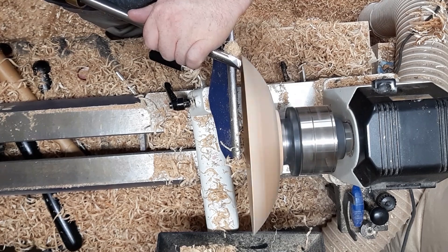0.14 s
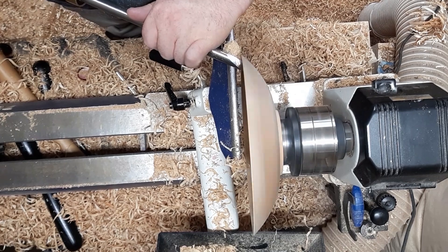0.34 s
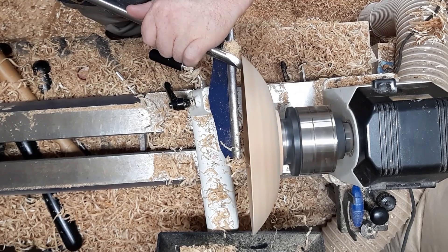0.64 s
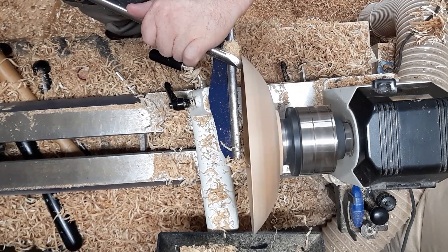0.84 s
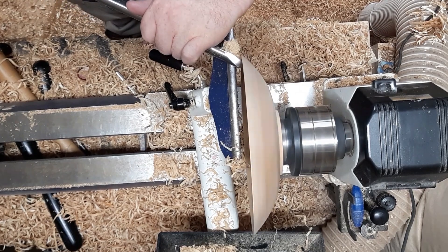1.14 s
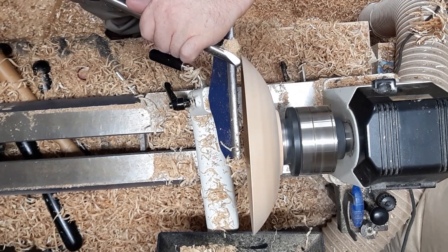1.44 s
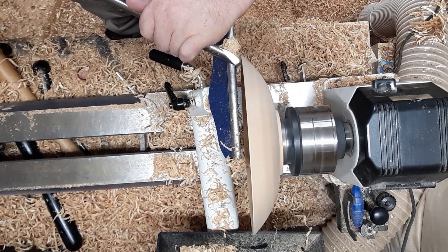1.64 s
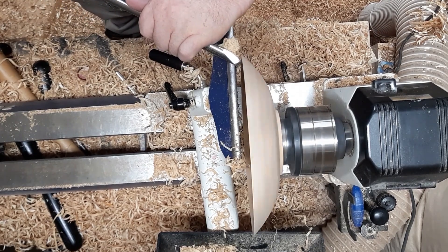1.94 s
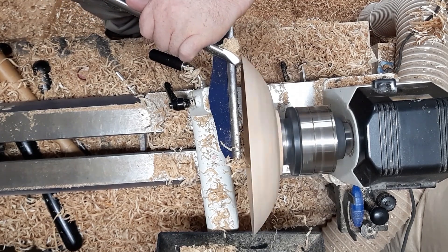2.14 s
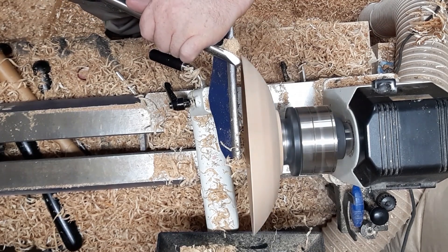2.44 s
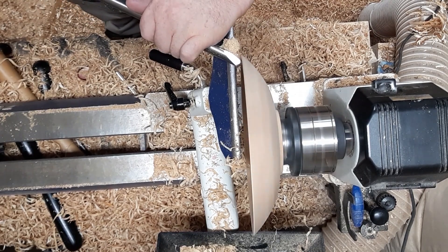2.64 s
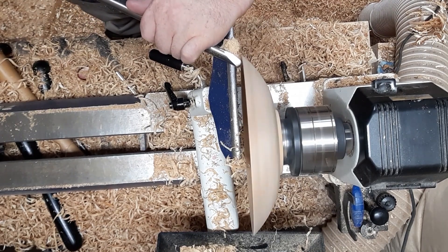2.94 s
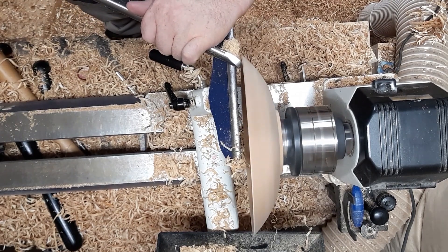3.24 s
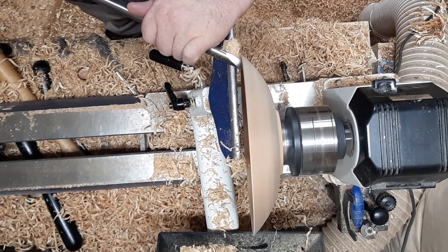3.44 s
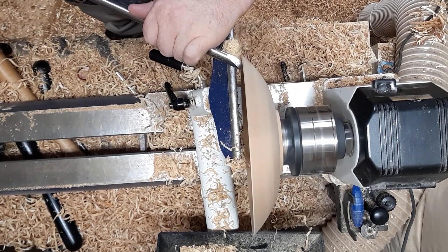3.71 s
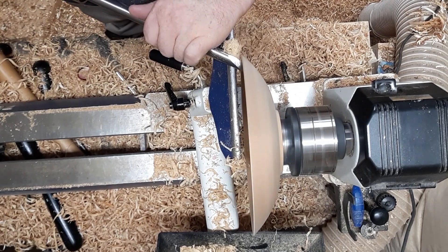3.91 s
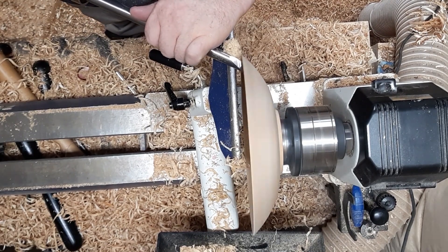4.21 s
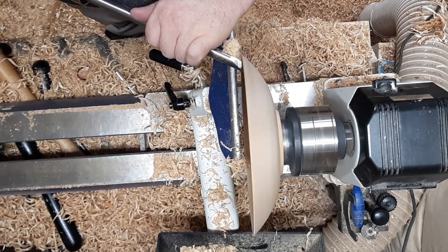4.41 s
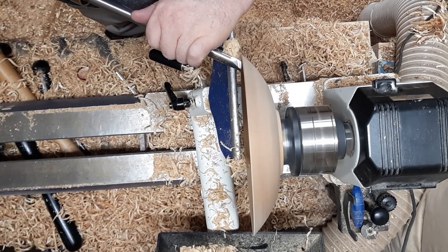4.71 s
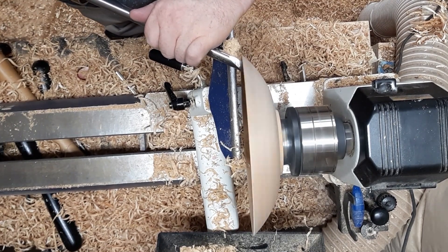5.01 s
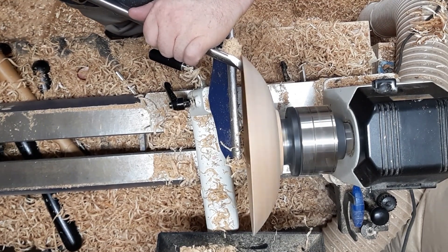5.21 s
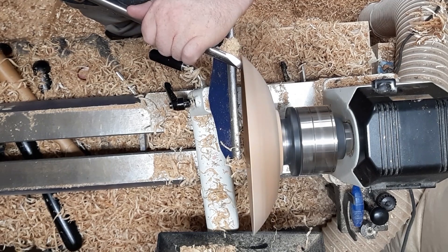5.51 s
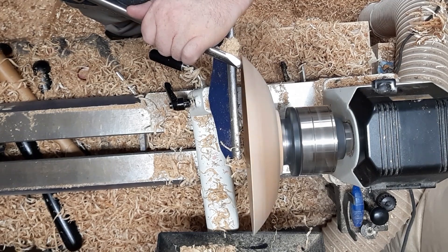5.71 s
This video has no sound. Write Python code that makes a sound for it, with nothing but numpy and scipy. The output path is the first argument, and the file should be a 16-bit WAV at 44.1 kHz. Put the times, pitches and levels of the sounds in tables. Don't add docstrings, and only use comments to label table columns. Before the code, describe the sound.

Rapid pulsing wood-lathe scrape with ringing chatter, a brief break of motor whir and belt knocks, then the shaving noise returns until the end.

```python
import sys
import numpy as np
from scipy import signal
from scipy.fft import rfft, irfft, next_fast_len
from scipy.io import wavfile
from scipy.ndimage import map_coordinates

SR = 44100
rng = np.random.default_rng(int(sys.argv[2]) if len(sys.argv) > 2 else 0)


def wrap_up_sound(samples):
    columns = np.atleast_2d(samples).T
    tamed = np.clip(columns, -1, 1)
    steps = np.round(tamed * 32767).astype(np.int16)
    wavfile.write(sys.argv[1], SR, steps)


def undo_db(level):
    steps = np.asarray(level, float) / 20
    return 10 ** steps


N = 258426
FIRM_DB = -30
PROUD_FLOOR_DB = -20


def unit(x):
    return x / np.sqrt(np.mean(x ** 2) + 1e-20)


def along(points, hz):
    f, v = np.transpose(points)
    return np.interp(np.log(hz + 1), np.log(f + 1), v)


def wobble(rate_hz):
    knots = rng.standard_normal(int(N * rate_hz / SR) + 4)
    return map_coordinates(knots, [np.arange(N) * rate_hz / SR])


def bumps(rows):
    t = np.arange(N) / SR
    return sum(db * np.exp(-.5 * ((t - s) / half_s) ** 2) for s, half_s, db in rows)


def filtered(x, response):
    m = next_fast_len(N + 8192)
    spectrum = rfft(x, m) * response(np.fft.rfftfreq(m, 1 / SR))
    return irfft(spectrum, m)[..., :N]


def mode(f, hz, width_hz):
    return 1j * f * width_hz / (hz * hz - f * f + 1j * f * width_hz)


def colour(spectrum, modes):
    def response(f):
        resonances = sum(undo_db(db) * mode(f, hz, width_hz) for hz, width_hz, db in modes)
        return undo_db(along(spectrum, f)) * (1 + resonances)
    return response


def steady(cycles):
    phase = 2 * np.pi * cycles
    return np.sqrt(2) * np.array([np.sin(phase), -np.cos(phase)])


def turns():
    # (time [s], turns done)
    spindle = [(-.008, 0), (.784, 12), (1.246, 19), (2.63, 40), (2.963, 45), (5.75, 87), (5.95, 90)]
    return np.interp(np.arange(N) / SR, *np.transpose(spindle))


def grips(spread_turns, *places):
    angle = turns()
    out = 0
    for at, size in zip(places[::2], places[1::2]):
        offset = (angle - at + .5) % 1 - .5
        out = out + size * np.exp(-.5 * (offset / spread_turns) ** 2)
    return out


def surface(memory):
    per_turn = 2925
    keep = np.clip(memory, 0, .97)
    ridges = signal.lfilter([1], [1, -keep], rng.standard_normal((2, 92, per_turn)), axis=1)
    return unit(ridges.reshape(2, -1)[:, (turns() * per_turn).astype(int)])


def fibres(grain_db):
    return unit(undo_db(grain_db * wobble(700)) * rng.standard_normal((2, N)))


def hand():
    # (time [s], pressure as shaving level [dB], hard spot proud [dB])
    passes = [
        [(0, -31.5, -39), (.16, -30, -20.5), (.43, -31, -6), (.6, -35, -4.5), (.8, -29, -2), (1.05, -35, -2.5),
         (1.35, -31.5, -3), (1.48, -50, 3.5), (1.62, -64.5, 7.5)],
        [(2.87, -31, -1), (3.07, -27.5, -4.5), (3.45, -29.5, -5), (3.7, -26, -7), (4.15, -28, -14.5),
         (4.4, -28.5, -42), (5.1, -30, -18), (5.32, -28.5, -8), (5.87, -29, -3.5)],
    ]
    # (time [s], half length [s], level [dB])
    eases = [
        (.33, 0.047, -8.5),
        (1.18, 0.048, -11),
        (4.6, 0.068, -5.5),
        (4.8, 0.072, -4),
        (5.58, 0.07, -3),
        (5.72, 0.049, -10.5),
    ]
    entry_s, rise_s, entry_db, lead_db = 2.617, .01, -29.5, -30
    first, second = map(list, passes)
    proud = second[0][2]
    entry = [(entry_s, entry_db + lead_db, proud), (entry_s + rise_s, entry_db, proud - 4)]
    t = np.arange(N) / SR
    strokes = []
    for stroke in (first, entry + second):
        s, db, _ = np.transpose(stroke)
        strokes.append(np.interp(t, s, db, -200, -200))
    s, _, proud_db = np.transpose(first + entry + second)
    ease_db = bumps(eases)
    return np.max(strokes, axis=0) + ease_db, ease_db, np.interp(t, s, proud_db)


def shaving():
    # (frequency [Hz], width [Hz], level over the hiss [dB])
    steel = [(1834, 7.6, 1), (2540, 9.6, -24), (3000, 23, -4.5), (3324, 28, 4.5), (3520, 48, -0.5),
             (3740, 76, -5), (4040, 21, 4.5), (4900, 16, 4.5), (5030, 22, -4), (5395, 40, 1.5),
             (6160, 17, -5)]
    # (frequency [Hz], width [Hz], level over the rumble [dB])
    bed = [(287.6, 70, -7), (404, 14, 4.5), (438, 6.2, 6), (539.4, 22, 7.5), (611, 25, 1.5),
           (912, 56, -0.5)]
    # (frequency [Hz], level per Hz [dB])
    hiss_spectrum = [(530, -52), (900, -6.5), (991, -19), (1660, -5), (1990, -5.5), (2600, -6.5),
                     (2730, -4.5), (3110, -6.5), (6110, -7), (7490, -15), (9530, -8), (14000, -9.5),
                     (16000, -9.5)]
    # (frequency [Hz], level per Hz [dB])
    catch_spectrum = [(900, -24.5), (2000, 3), (2500, 4), (3200, 0.5), (5000, 4), (6500, 0), (7600, -5.5),
                      (10000, 1.5), (15500, -2)]
    # (frequency [Hz], level per Hz [dB])
    rumble_spectrum = [(60, -38), (130, -23), (220, -2.5), (450, 1.5), (620, -3), (760, 2.5), (1100, -14),
                       (1600, -21.5)]
    side_grain = (.09, .32, .9, .66, 1, .85, .5)
    # (spread [turns], angle [turns], swell per lightness [dB/dB])
    proud_side = (.13, 0.87, 0.43)
    hard_spot = [
        (.02, .03, .9),
        (.1, .1, .8),
        (.08, .26, .25),
    ]
    catch_holds = 0.62
    hide_db, hide_share = -5, 0.5

    steady_db, ease_db, proud_db = hand()
    lightness_db = np.clip(-20.5 - steady_db, 0, 12)
    hidden = hide_share * np.clip(1.5 - proud_db / hide_db, 0, 1)
    swell_db = (2.0 + 0.6 * lightness_db) * (grips(*side_grain) - .6) * (1 - hidden)
    swell_db = swell_db + lightness_db * (grips(*proud_side) - .1)
    hiss = unit(filtered(fibres(grain_db=1.0), colour(hiss_spectrum, steel)))

    catch_db = steady_db - catch_holds * ease_db + proud_db
    bite = sum(grips(*part) for part in hard_spot)
    scrape = bite * undo_db(.5 * wobble(15)) * fibres(grain_db=1)
    catch = unit(filtered(scrape, colour(catch_spectrum, steel)))

    depth_db = -40.5 + 0.36 * (steady_db - FIRM_DB)
    depth_db = depth_db + 0.29 * np.arange(N) / SR
    depth_db = depth_db - 0.065 * np.maximum(proud_db, PROUD_FLOOR_DB)
    rumble = unit(filtered(surface(memory=0.77), colour(rumble_spectrum, bed)))
    return undo_db(steady_db + 1.1 + swell_db) * hiss + undo_db(catch_db + 5.0) * catch + undo_db(depth_db - 0.5) * rumble


def chatter():
    # (level at usual pressure [dB], per pressure [dB/dB], per hard spot [dB/dB])
    laws = [(-41, 0.6, 0.2), (-41, 0.3, 0.7), (-43.5, 0.6, 0.34), (-46, 0.3, 0.36), (-49, 0.6, 0.03),
            (-36, 0.6, .7), (-48, 0.76, -0.45), (-34, 0.7, 1.05), (-36, 0.5, 2.5)]
    # (time [s], half length [s], level [dB])
    bowl_spells = [
        [(.4, 0.27, 5), (3.42, .15, 6.5), (4.08, 0.13, 6), (5, 0.069, 0), (5.38, 0.13, 7)],
        [(.97, 0.25, 5), (3.65, 0.22, -3), (4.07, 0.071, 4), (5.68, 0.065, 1)],
        [(.02, 0.12, 10), (2.83, 0.14, -11), (3.3, 0.14, 3), (3.83, .08, 6), (4.52, 0.17, 13.5),
         (5, 0.15, 10.5), (5.6, .2, 8)],
        [(.45, 0.22, 4), (2.8, 0.15, -20), (3.9, 0.32, 10.5), (5.22, 0.17, 14.5)],
        [(2.8, 0.092, 3), (4, 0.14, 10.5), (4.3, 0.074, 5), (5.15, 0.11, 7)],
    ]
    # (time [s], half length [s], level [dB])
    tool_spells = [
        [(.02, 0.064, 11), (.6, .12, -19), (2.8, 0.088, 0.5), (3.12, 0.1, 5), (5.65, .12, 5)],
        [(2.83, 0.067, -11), (3.65, 0.27, 6.5), (4.45, 0.16, 2.5), (5.3, 0.094, 4)],
        [(.5, .06, 5.5), (.87, 0.085, 5.5), (1.3, 0.057, 3.5), (2.66, .06, -3), (3.95, .14, 3.5)],
        [(.5, 0.086, -17), (2.8, 0.071, 5), (3.3, 0.18, 12), (3.65, 0.13, 15.5)],
    ]
    pressure_db, _, proud_db = hand()
    proud_db = np.maximum(proud_db, PROUD_FLOOR_DB)
    graze_db = 0.98 * np.minimum(pressure_db + 40, 0)
    levels = []
    for (db, follows, leans), spells in zip(laws, bowl_spells + tool_spells):
        level_db = db + follows * (pressure_db - FIRM_DB) + leans * proud_db
        levels.append(level_db + graze_db + bumps(spells))
    return levels


def ringing():
    # (frequency [Hz], width [Hz], level [dB], drive between grips [0-1], clean share [0-1])
    bowl_modes = [(754, 40, -.5, .05, .85), (1440, 40, -3, .05, .9), (1492, 40, -3, .05, .9),
                  (1705, 60, -4, .05, .8), (795, 50, -3, .05, .7)]
    # (frequency [Hz], width [Hz], level [dB], drive between grips [0-1], clean share [0-1])
    tool_modes = [(2465, 60, -1.5, .06, .92), (2768, 50, -1, .07, .95), (3080, 100, -5, .1, .7),
                  (4792, 100, -5, .1, .7)]
    # (frequency [Hz], width [Hz], level [dB], drive between grips [0-1], clean share [0-1])
    rest_mode = (3890, 90, -8, .1, .5)
    mode_grips = [(.055, .68, 1, .87, .75, .22, .35), (.08, .09, 1, .4, .15, .9, .25),
                  (.045, .93, 1, .17, .35, .42, .2), (.035, .08, 1, .86, .85, .3, .45),
                  (.06, .6, 1, .24, .7, .88, .45), (.036, .065, 1, .3, .15, .62, .15),
                  (.05, .3, 1, .87, .75, .58, .1), (.035, .035, 1, .17, .5, .66, .22),
                  (.03, 0, 1, .1, .75, .66, .35)]
    rest_grip = (.05, .66, 1, .3, .25)
    waver = .004
    t = np.arange(N) / SR
    levels = chatter()
    levels.append(levels[-3])
    rows = bowl_modes + tool_modes + [rest_mode]
    out = 0
    for level_db, row, places in zip(levels, rows, mode_grips + [rest_grip]):
        hz, width_hz, db, between, clean = row
        ripple = steady(hz * t + waver * width_hz * wobble(25))
        rough = unit(filtered(surface(memory=0.5), lambda f: mode(f, hz, width_hz)))
        share = np.clip(clean, .5, 1)
        tone = np.sqrt(share) * ripple + np.sqrt(1 - share) * rough
        grip = unit(np.clip(between, 0, .2) + grips(*places))
        out = out + undo_db(level_db + db + 0.33 * wobble(21.92)) * grip * tone
    return out


def motor():
    # (frequency [Hz], level per Hz [dB])
    idle = [(15, -61), (25, -33), (123, -8), (503, -9), (560, -12.5), (796, -5), (887, -8.5), (1190, -10.5),
            (1400, -10.5), (2110, -10.5), (2350, -21), (5280, -16), (7310, -28), (10100, -20.5),
            (12200, -33), (16000, -38)]
    # (frequency [Hz], width [Hz], level over the rush [dB])
    housing = [(233, 12, 10), (284, 30, 3), (350.5, 15, 11.5), (463, 57, 8), (567, 23, 17.5), (722, 10, 11),
               (792, 4.3, 10), (1065, 26, 14.5), (2046, 27, 4.5), (9400, 140, -17)]
    # (frequency [Hz], level [dB rms])
    tones = [(125.3, -67), (1210, -60.5), (564, -62.5), (806, -64), (1990, -61), (5076, -80), (9945, -61),
             (10386, -75)]
    t = np.arange(N) / SR
    rush = unit(filtered(fibres(grain_db=2.0), colour(idle, housing)))
    out = undo_db(-47.5 + 0.44 * wobble(12)) * rush
    for hz, db in tones:
        out = out + undo_db(db + 0.11 * wobble(24)) * steady(hz * t + 0.015 * wobble(14))
    return out


def belt():
    # (time [s], knock level [dB], tick level [dB], tick frequency [Hz])
    knocks = [
        (1.672, -48, -44, 1800),
        (2.012, -46, -62, 1500),
        (2.18, -50, -40, 1700),
        (2.282, -60, -43, 5150),
        (2.348, -48, -44, 1900),
        (2.522, -48, -58, 1300),
        (3.018, -41, -60, 1500),
        (3.188, -41, -60, 1500),
        (4.943, -40, -60, 1500),
    ]
    # (frequency [Hz], level [dB], t60 [s])
    pulley = [(582, 4, 0.047), (830, -25, .05), (1044, 10.5, 0.053), (1280, -32, .05), (1690, -1, .03),
              (2160, 8, 0.011)]
    t = np.arange(SR // 8) / SR
    out = np.zeros((2, N + SR))
    onset = 1 - np.exp(-t / 0.0016)
    ring = sum(undo_db(level_db - 60 * t / t60_s) * np.sin(2 * np.pi * hz * t) for hz, level_db, t60_s in pulley)
    for s, db, tick_db, tick_hz in knocks:
        cluster = sum(np.sin(2 * np.pi * (tick_hz + off_hz) * t) for off_hz in (-370, -130, 140, 420))
        tick = undo_db(-60 * t / .03) * cluster
        hit = (undo_db(db) * ring + undo_db(tick_db) * tick) * onset
        start = round(s * SR)
        out[:, start:start + len(t)] += hit * [[1], [.4]]
    return out[:, :N]


def scene():
    # (frequency [Hz], likeness [0-1])
    alike = [(30, .45), (130, .87), (300, .72), (640, .62), (1400, .4), (3000, .42), (7000, .28),
             (15000, .25)]
    # (frequency [Hz], phase [rad])
    lead = [(0, 0), (780, -0.1), (1720, 1.6), (2500, 6.4), (3100, 7.9), (4220, 8.6), (5250, 3.8),
            (8100, -4.4), (9990, 3.3), (10800, 11.4), (12400, 12.5), (14000, 12.7), (15200, 2.0),
            (16500, -0.6)]
    # (frequency [Hz], level [dB])
    lean = [(60, 3), (110, -2), (200, 0), (380, -2.5), (700, 1), (1290, -5.5), (2380, -2), (4400, -7),
            (8120, 1.5), (15000, 1.0)]

    def spread(hz):
        half_angle = np.arccos(np.clip(along(alike, hz), -1, 1)) / 2
        return np.array([np.cos(half_angle), np.sin(half_angle)])

    def ports(hz):
        left = undo_db(along(lean, hz) / 2) * np.exp(.5j * along(lead, hz))
        return left ** np.array([[1], [-1]])

    mid, side = filtered(shaving() + ringing() + motor() + belt(), spread)
    return filtered(np.array([mid + side, mid - side]), ports)


def roll_off(x):
    return signal.sosfilt(signal.butter(12, 16970, fs=SR, output="sos"), x)


def record(dry):
    top_hz, edge_hz = 15790, 110

    def band_limit(hz):
        return np.sin(np.pi / 2 * np.clip((top_hz - hz) / edge_hz, 0, 1)) ** 2

    mix = filtered(dry, band_limit)
    return roll_off(mix)


dry = scene()
out = record(dry)
wrap_up_sound(out)
```